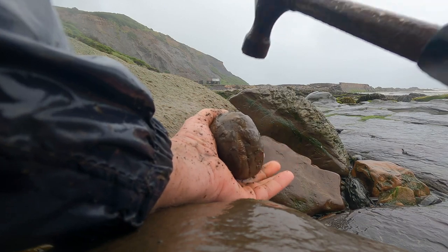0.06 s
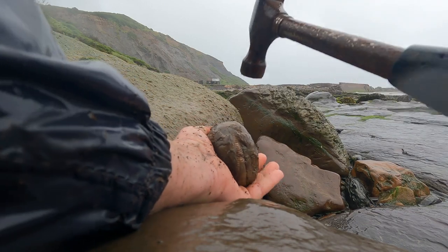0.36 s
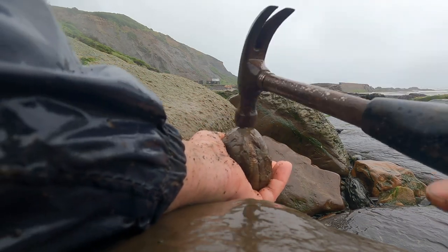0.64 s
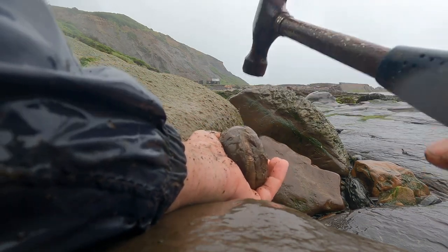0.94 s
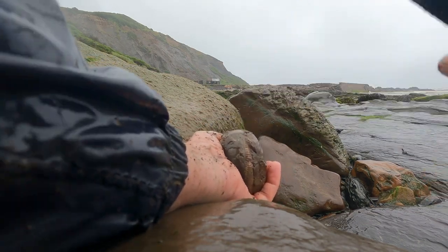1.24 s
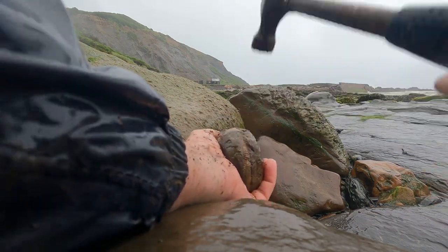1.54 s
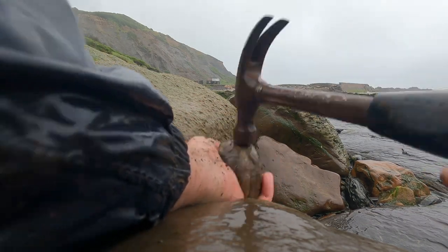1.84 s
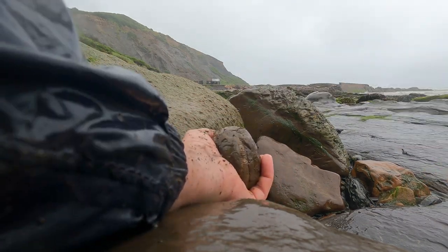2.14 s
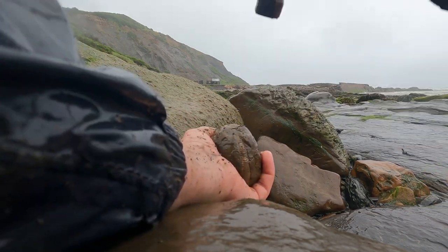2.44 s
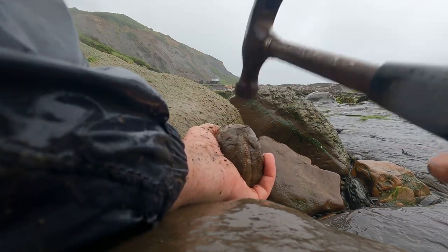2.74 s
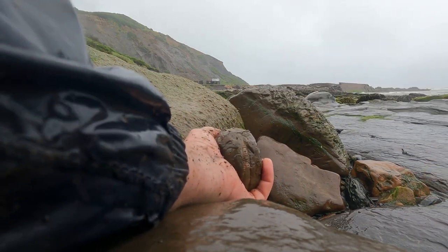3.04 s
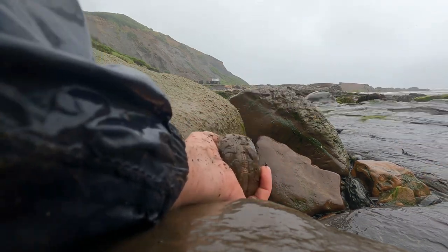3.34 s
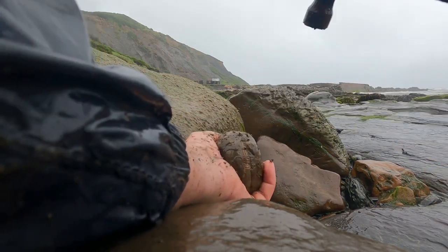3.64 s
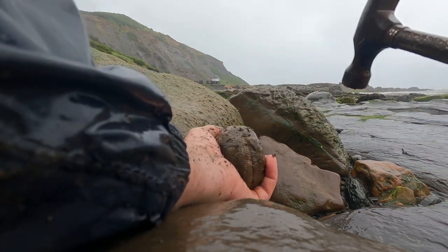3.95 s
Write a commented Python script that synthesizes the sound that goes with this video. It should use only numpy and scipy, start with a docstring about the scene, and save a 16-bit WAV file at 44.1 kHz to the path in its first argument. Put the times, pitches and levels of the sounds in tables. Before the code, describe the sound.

A steel hammer knocks on a hand-held stone close to the microphone: two light taps, two harder cracks, a pause, then two more sharp blows. Behind it, soft surf washes a rocky shore, wind rumbles and a sleeve faintly rustles.

```python
"""A rocky shore, with a stereo microphone close to a stone nodule held in the hand.
A steel hammer strikes it six times, gently at first and then hard: a knock, a gritty crack and a thud
in the palm, with short reflections off the boulders. Surf hisses behind, wind rumbles on the microphone
and a waterproof sleeve rustles. The hard blows overload the recorder, whose limiter pushes the surf
down and lets it swell back."""
import sys
import numpy as np
from scipy import signal
from scipy.io import wavfile
from scipy.ndimage import uniform_filter1d, minimum_filter1d

SR = 44100
rng = np.random.default_rng(int(sys.argv[2]) if len(sys.argv) > 2 else 0)


def pcm_store(signal):
    """Save signal as 16-bit PCM."""
    levels = np.round(np.clip(np.atleast_2d(signal), -1, 1) * 32767)
    wavfile.write(sys.argv[1], SR, levels.astype(np.int16).T)


N = 176400
TIME = np.arange(N) / SR


def from_db(db):
    """Decibels to gain."""
    return 10 ** (np.asarray(db) / 20)


def rms_one(x):
    """Scale to rms 1."""
    return x / np.sqrt(np.mean(x ** 2) + 1e-20)


def at_hz(points, hz):
    """Read a curve on a log-frequency axis."""
    freqs, values = np.transpose(points)
    return np.interp(np.log(hz), np.log(freqs), values)


def panned(x, pan_db):
    """Place a sound with the left channel pan_db above the right."""
    return x * from_db([[pan_db / 2], [-pan_db / 2]])


def filtered(x, hz, kind, order=2):
    """Butterworth filter."""
    sos = signal.butter(order, np.clip(hz, 10, .45 * SR), kind, fs=SR, output="sos")
    return signal.sosfilt(sos, x)


def add(out, start_s, x):
    """Mix a short sound in at its time."""
    i = int(start_s * SR)
    out[:, i:i + x.shape[-1]] += x[..., :N - i]


def drift(rate_hz):
    """A smooth random wander of rms about 1, mostly slower than rate_hz."""
    step, settle = 40, 2000
    pole = np.exp(-2 * np.pi * rate_hz * step / SR)
    white = rng.standard_normal(N // step + settle + 2)
    slow = signal.lfilter([1], [1, -2 * pole, pole * pole], white)[settle:]
    return np.interp(np.arange(N) / step, np.arange(len(slow)), rms_one(slow))


def swells(rows):
    """A rounded rise and fall of gain for each row."""
    return sum(from_db(db) * np.abs(np.sin(np.pi * np.clip((TIME - start_s) / length_s, 0, 1))) ** 0.63
               for start_s, length_s, db in rows)


def banded_noise(spectrum, flicker_db):
    """Stereo noise of rms 1 in 16 bands, each with its own level, flicker and width."""
    # The image is narrow in the bass, wider on top. Each row: frequency in Hz, left-right correlation.
    correlation = [(30, 0.8), (70, 1), (140, 1), (500, 0.94), (1500, 0.88), (5000, 0.63), (12000, 0.66)]
    edges = np.geomspace(spectrum[0][0], spectrum[-1][0], 17)
    white = rng.standard_normal((2, 2, N))
    out = 0
    for k, band in enumerate(zip(edges, edges[1:])):
        mid, side = filtered(white[k % 2], band, "band")
        hz = np.sqrt(band[0] * band[1])
        alike = at_hz(correlation, hz)
        gain = from_db(at_hz(spectrum, hz) + flicker_db * drift(12.2))
        out = out + gain * (np.sqrt(1 + alike) * mid + np.sqrt(1 - alike) * side * [[1], [-1]])
    return rms_one(out)


def surf():
    """Surf in the background: an even wash whose level moves slowly."""
    # Tone of the surf. Each row: frequency in Hz, relative density in dB.
    spectrum = [(150, -24), (250, 2.5), (386, -10.5), (460, -17), (607, -9.5), (686, -17), (988, -10),
                (1140, -12.5), (1760, -18.5), (1910, -24.5), (3170, -27), (4340, -27), (7700, -47.5),
                (12300, -63.5), (16000, -65)]
    # Rise and fall of the surf. Each row: time in seconds, level in dB.
    levels = [(0, -32), (.7, -32), (1.45, -33.5), (1.85, -33), (2.3, -40), (2.8, -36.5), (3.2, -36),
              (4, -38.5)]
    return from_db(np.interp(TIME, *np.transpose(levels))) * banded_noise(spectrum, flicker_db=-0.02)


def wind():
    """Wind on the microphone: a lumpy rumble with a few deep buffets."""
    # Tone of the rumble. Each row: frequency in Hz, relative density in dB.
    spectrum = [(20, -8.5), (40, 2), (70, 2), (100, 1.5), (150, 7), (220, -13), (320, -9.5), (500, -40),
                (1000, -70)]
    # Strength of the rumble. Each row: time in seconds, level in dB.
    levels = [(0, -26.5), (.6, -27), (1.1, -26.5), (1.7, -28.5), (2.2, -35), (2.45, -34.5), (2.7, -32),
              (3.4, -37), (4, -34.5)]
    # Gusts hitting the microphone. Each row: start in seconds, length in seconds, level in dB.
    gusts = [(1.09, 0.071, -23), (2.12, 0.32, -33.5), (2.38, 0.11, -28.5)]
    rumble = from_db(np.interp(TIME, *np.transpose(levels))) * banded_noise(spectrum, flicker_db=3.0)
    buffets = swells(gusts) * rms_one(filtered(rng.standard_normal(N), (40, 56.4), "band"))
    return rumble + buffets


def sleeve():
    """Waterproof cloth slides and crinkles in short swells as the arm moves."""
    # Moves of the arm. Each row: start in seconds, length in seconds, level in dB.
    rustles = [(.39, 0.14, -43), (0.51, 0.19, -44), (1.218, 0.061, -52), (1.63, 0.055, -42),
               (2.013, 0.057, -36), (2.985, 0.037, -38), (3.32, 0.14, -43)]
    # Tone of the cloth. Each row: frequency in Hz, relative density in dB.
    spectrum = [(1500, -9), (3500, -12.5), (5500, -11.5), (7500, -12.5), (9500, -36), (15000, -44)]
    crinkle = from_db(1.5 * drift(rate_hz=44))
    return swells(rustles) * crinkle * banded_noise(spectrum, flicker_db=1)


def ticks():
    """Tiny dry bursts of grit and cloth around the blows."""
    # Single ticks. Each row: start in seconds, gain in dB, pitch in Hz.
    events = [(.066, -36, 6900), (.118, -44, 10000), (1.555, -20, 2300), (1.584, -2.5, 2750),
              (2.06, -22, 5000), (2.725, -47, 9500), (3.002, -19, 5600), (3.0295, -23.5, 5400)]
    decay_s = .0008
    out, t = np.zeros((2, N)), TIME[:SR // 20]
    for start_s, db, hz in events:
        burst = rng.standard_normal(len(t)) * np.exp(-t / decay_s)
        add(out, start_s, from_db(db) * filtered(burst, (.72 * hz, 1.3 * hz), "band"))
    return out


def boulders(x):
    """Short diffuse reflections from the rocks around the microphone."""
    # Near and far scatter. Each row: level in dB, 60 dB decay in seconds, treble corner in Hz.
    scatter = [(-22, .024, 3500), (-40, .15, 5000)]
    first_echo_s, width = .002, .3
    t, out = TIME[:len(x)], 0
    for db, t60, top_hz in scatter:
        mid, side = filtered(rng.standard_normal((2, len(t))), top_hz, "low", order=1)
        fade = from_db(-60 * t / t60) * (t > first_echo_s)
        echo = (mid + width * side * [[1], [-1]]) * fade / np.sqrt(np.sum(fade ** 2))
        out = out + from_db(db) * signal.fftconvolve(x[None], echo, axes=1)[:, :len(x)]
    return out


def rasp():
    """A gritty noise that swells quickly and ends in the hardest blow."""
    # Tone of the rasp. Each row: frequency in Hz, relative density in dB.
    spectrum = [(700, -14), (1300, -9), (2700, -17), (3400, -4), (4200, 4), (4800, -24), (6000, -17),
                (8500, -17)]
    end_s, rise_s, level_db = 1.939, .017, -14.5
    ahead_s = end_s - TIME
    rise = np.exp(-(ahead_s / rise_s) ** 2) * (ahead_s > 0)
    grain = from_db(level_db + 2 * drift(rate_hz=150))
    return grain * rise * banded_noise(spectrum, flicker_db=5.5)


def struck(modes, scale=1):
    """Dying sines, varied in strength and tuning because each blow lands on another spot."""
    spread_db, detune = 1.2, .012
    t, out = TIME[:SR // 10], 0
    for freq, db, t60 in modes:
        strength, tuning = rng.normal(size=2)
        hz = freq * scale * (1 + detune * tuning)
        out = out + from_db(db + spread_db * strength - 60 * t / t60) * np.sin(2 * np.pi * hz * t)
    return out


def knock(db, hz):
    """Hammer face on stone: a harder blow is a shorter contact, so its knock is brighter."""
    # Modes of the knock. Each row: multiple of the pitch, relative level in dB, 60 dB decay in seconds.
    modes = [(.38, -12, 0.0066), (1, -1.5, 0.0079), (1.38, -2, 0.0052)]
    soft_top_hz, db_per_octave = 1550, 14.5
    top_hz = soft_top_hz * 2 ** (db / db_per_octave)
    body = filtered(struck(modes, scale=hz), 483, "high")
    return from_db(db) * filtered(body, top_hz, "low")


def crush():
    """A few milliseconds of grit crumbling under the hammer face."""
    level_db, t60 = -5, 0.006
    t = TIME[:SR // 10]
    grit = rms_one(filtered(rng.standard_normal(len(t)), (3700, 6300), "band"))
    return grit * from_db(level_db - 60 * t / t60)


def crack(db, hz):
    """The stone's own snap, pitched by the spot that is hit, with ringing steel and crushed grit."""
    # Ring of the head. Each row: frequency in Hz, relative level in dB, 60 dB decay in seconds.
    steel_modes = [(4750, -1.5, .0035), (5500, -6, 0.012), (7200, -11, .0028), (10600, -15, .002),
                   (14100, -23.5, 0.0018)]
    snap_db, snap_t60 = 2, 0.0054
    snap = struck([(hz, snap_db, snap_t60)])
    return from_db(db) * filtered(snap + struck(steel_modes) + crush(), 3030, "high", order=3)


def thud(db):
    """The stone is driven into the palm with a low, damped bump."""
    # Stone in the hand. Each row: frequency in Hz, relative level in dB, 60 dB decay in seconds.
    modes = [(100, -2, .026), (270, -2, 0.019)]
    return from_db(db) * struck(modes)


def hammer():
    """Close blows of steel on stone: each is a clack, echoed by the rocks, and a thud in the hand."""
    # The six blows. Each row: start in seconds, knock gain in dB, knock pitch in Hz, crack gain in dB,
    # crack pitch in Hz, treble corner of the contact in Hz, thud gain in dB, left over right in dB.
    blows = [(0.7448, -3.5, 1170, -32.5, 4430, 14000, -17, -2),
             (1.1240, 1.5, 1260, -22.5, 4800, 8000, -10.5, -3.5),
             (1.5325, 17, 1210, 5.5, 3430, 5000, -10, -2.5), (1.9395, 29.5, 1240, 29, 4310, 11000, -7, 2),
             (2.8811, 13, 1324, 16.5, 3510, 13800, -15, -1), (3.279, 24, 1267, 20.5, 3900, 7950, -10, 2)]
    out = np.zeros((2, N))
    for start_s, knock_db, knock_hz, crack_db, crack_hz, contact_hz, thud_db, pan_db in blows:
        clack = filtered(knock(knock_db, knock_hz) + crack(crack_db, crack_hz), contact_hz, "low")
        add(out, start_s, panned(clack + thud(thud_db), pan_db) + boulders(clack))
    return out


def scene():
    """Hammering close to the microphone, the shore behind."""
    left_lag_s = 2.3e-5  # the blows reach the left microphone port a little later
    left, right = hammer()
    blows = np.array([np.interp(TIME - left_lag_s, TIME, left), right])
    return blows + rasp() + ticks() + sleeve() + panned(surf() + wind(), pan_db=-1)


def limited(x, ceiling_db, hold_s, release_s):
    """Stereo-linked limiter: gain drops just ahead of a peak, holds, then recovers."""
    look_ahead_s = 0.0016
    ahead, hold = int(look_ahead_s * SR) + 1, int(hold_s * SR) + 1
    peak_db = 20 * np.log10(np.abs(x).max(axis=0) + 1e-9)
    over_db = np.maximum(peak_db - ceiling_db, 1e-9)
    held_db = -minimum_filter1d(-over_db, hold, origin=(hold - 1) // 2)
    # The cut dies away exponentially until a new peak tops it.
    cut_db = np.exp(np.maximum.accumulate(np.log(held_db) + TIME / release_s) - TIME / release_s)
    early_cut_db = np.pad(cut_db, (0, ahead // 2), "edge")[ahead // 2:]
    return x * from_db(-uniform_filter1d(early_cut_db, ahead))


def record(dry):
    """The recorder limits bass and treble apart, adds a faint hiss, clips peaks and cuts the top."""
    # The recorder's own hiss. Each row: frequency in Hz, relative density in dB.
    hiss_spectrum = [(1000, -11), (4000, -0.5), (7500, 1), (11000, -28), (16000, -45)]
    split_hz, cutoff_hz = 207, 16800
    bass = filtered(dry, split_hz, "low", order=5)
    bass = limited(bass, ceiling_db=-15.5, hold_s=0.006, release_s=0.01)
    treble = filtered(dry, split_hz, "high", order=5)
    treble = limited(treble, ceiling_db=4.7, hold_s=0.069, release_s=0.079)
    hiss = from_db(-67.5) * banded_noise(hiss_spectrum, flicker_db=0)
    clipped = .95 * np.clip(bass + treble + hiss, -1, 1)
    return signal.sosfilt(signal.ellip(8, .1, 70, cutoff_hz, fs=SR, output="sos"), clipped)


dry = scene()
out = record(dry)
pcm_store(out)
```